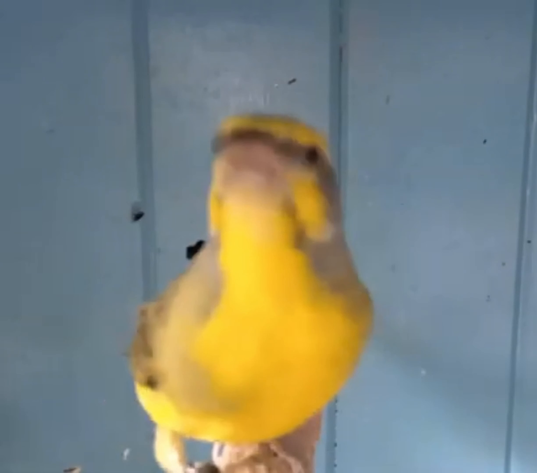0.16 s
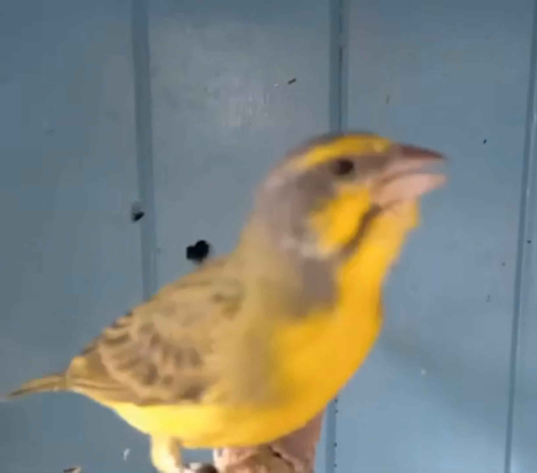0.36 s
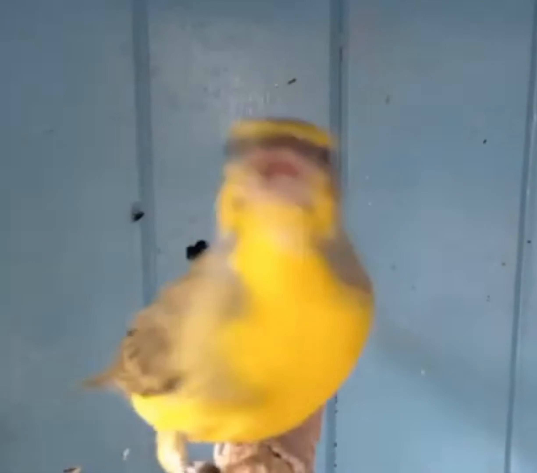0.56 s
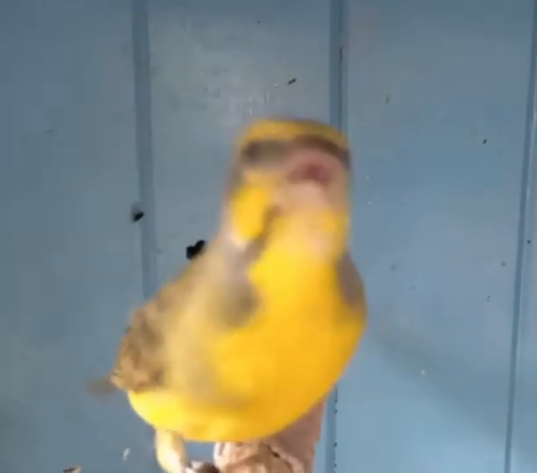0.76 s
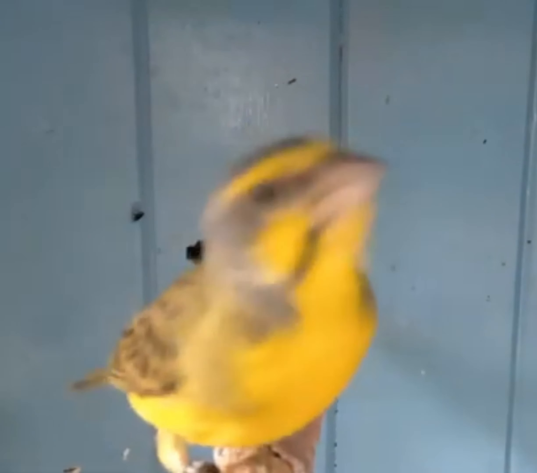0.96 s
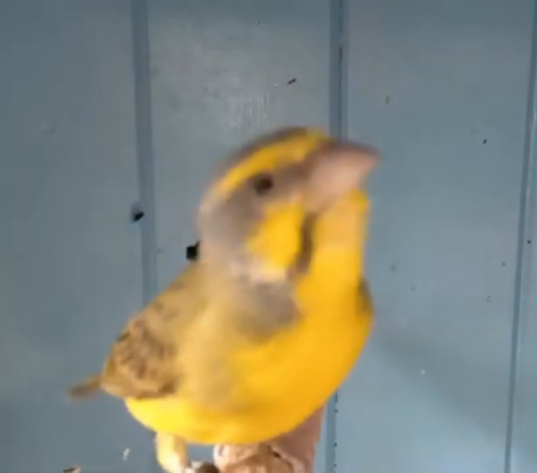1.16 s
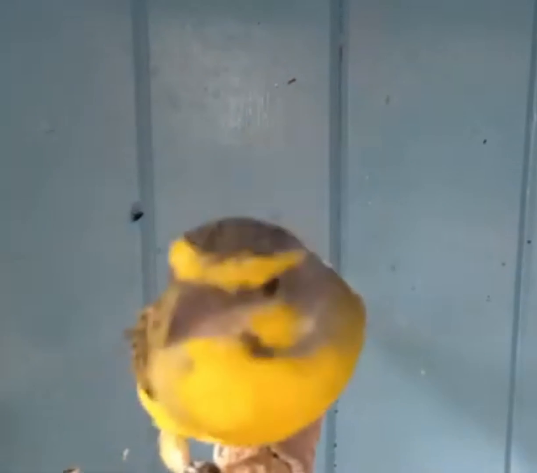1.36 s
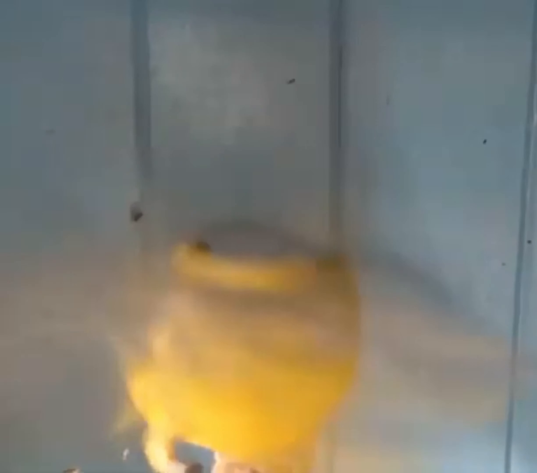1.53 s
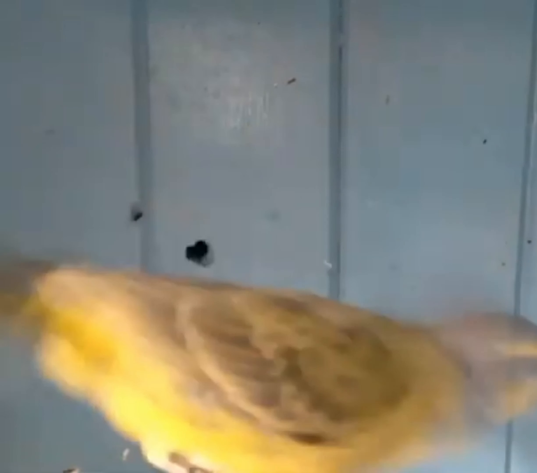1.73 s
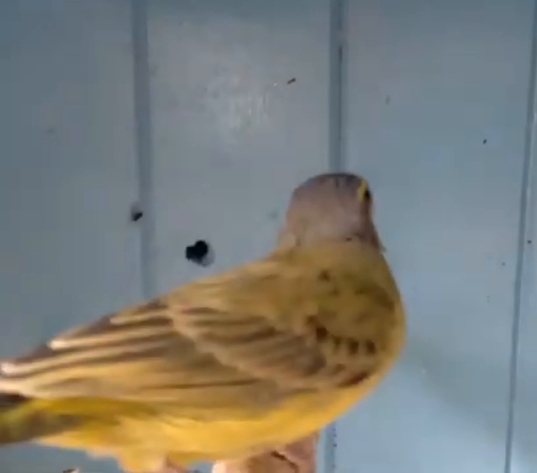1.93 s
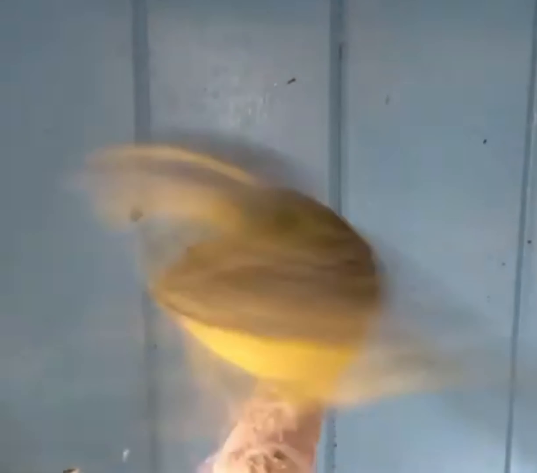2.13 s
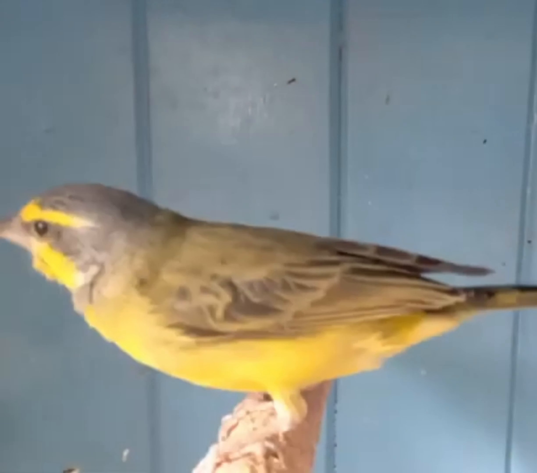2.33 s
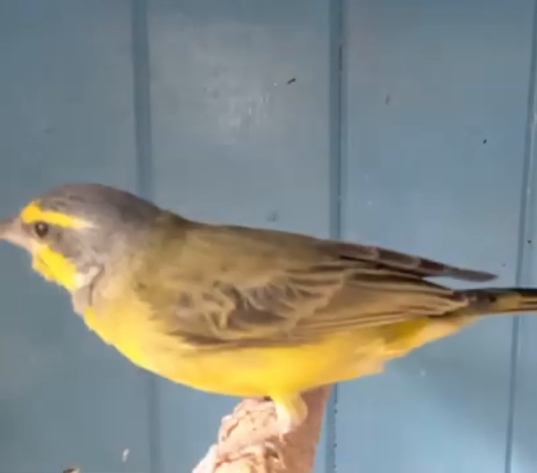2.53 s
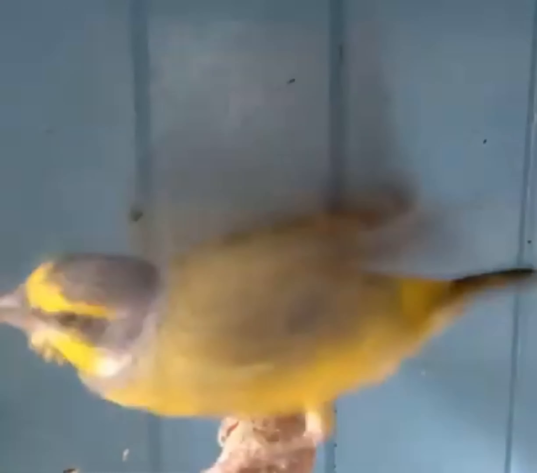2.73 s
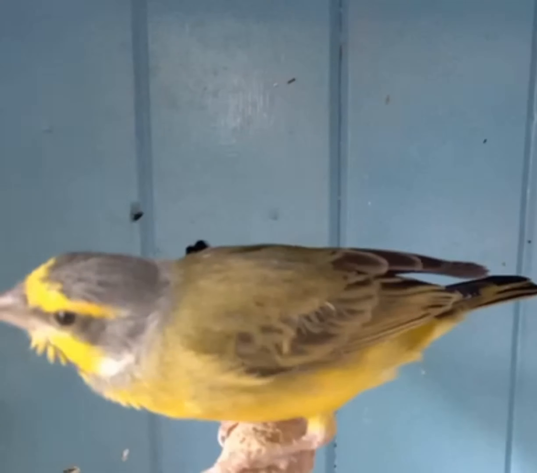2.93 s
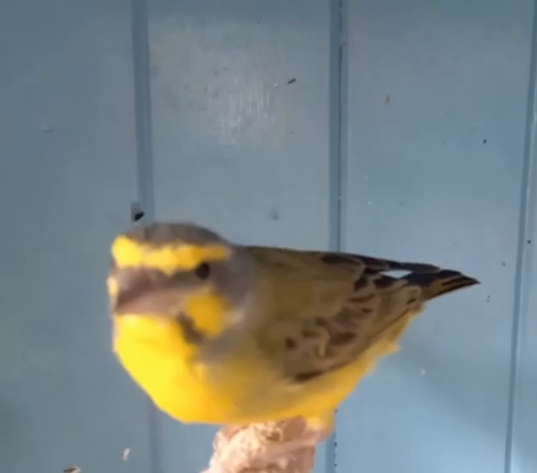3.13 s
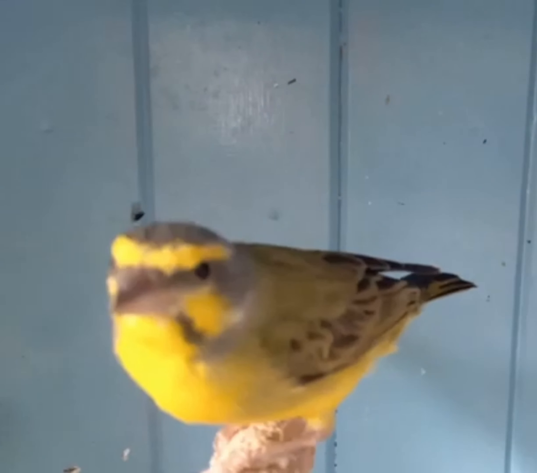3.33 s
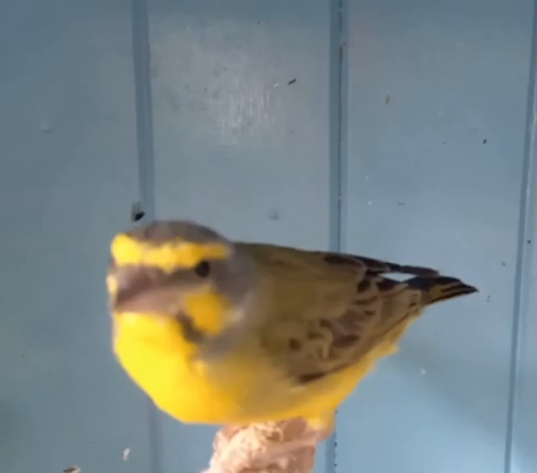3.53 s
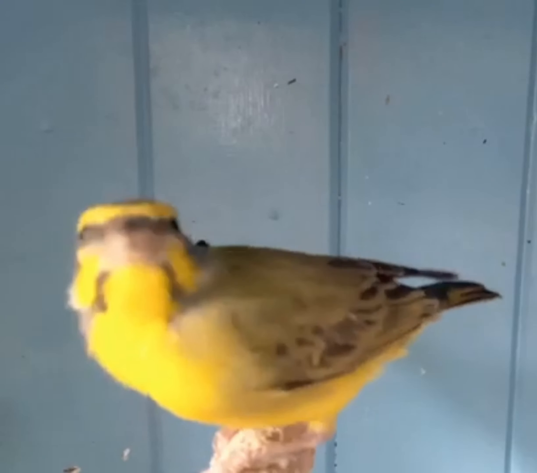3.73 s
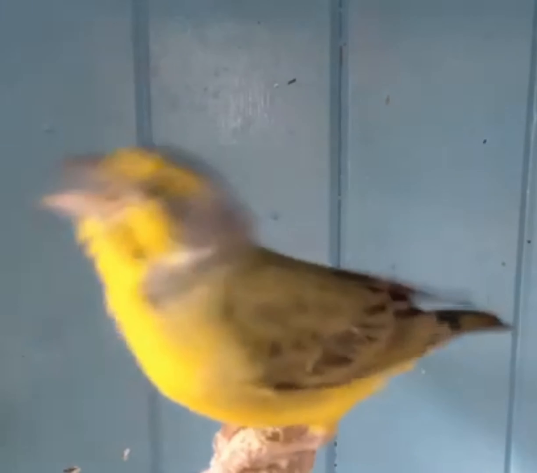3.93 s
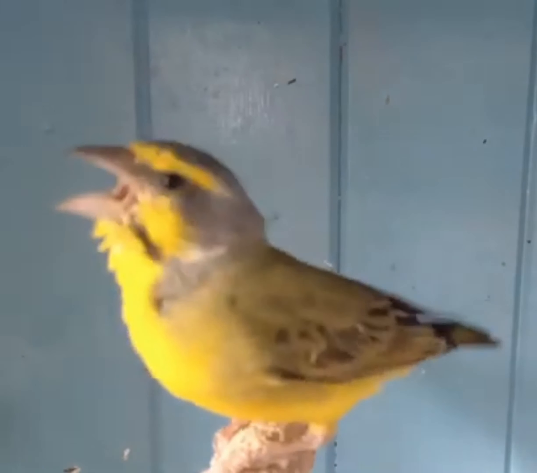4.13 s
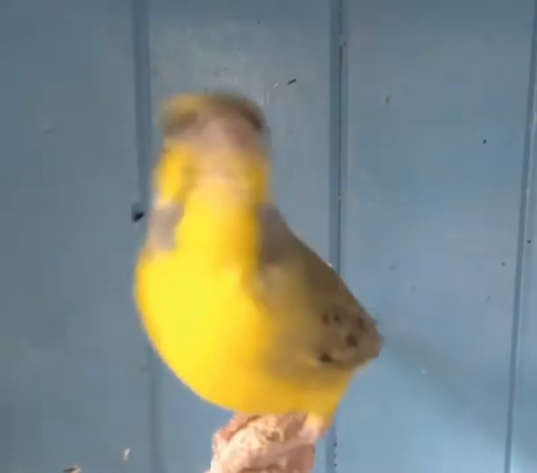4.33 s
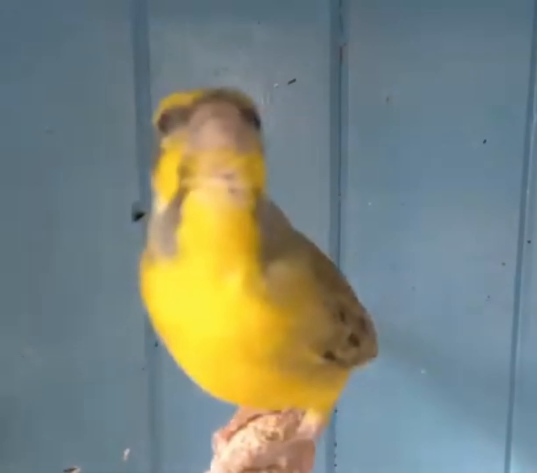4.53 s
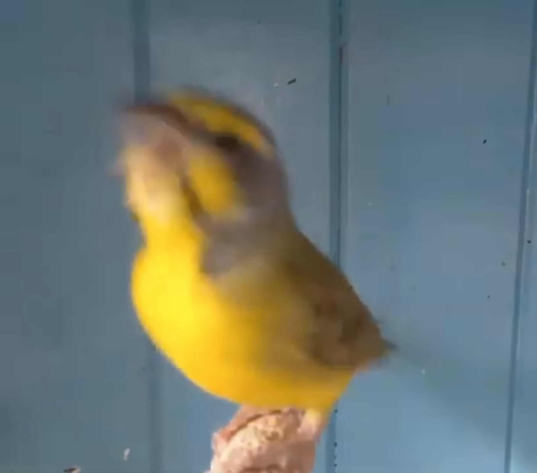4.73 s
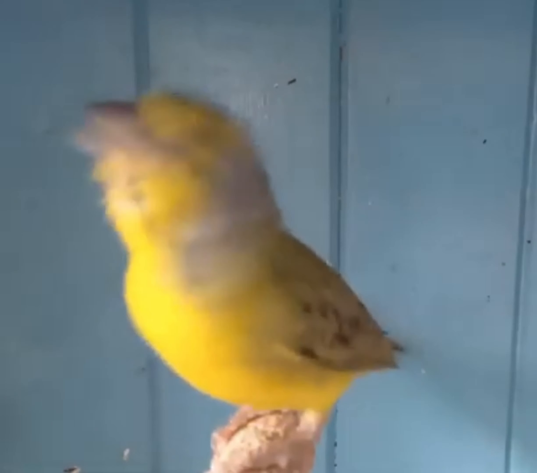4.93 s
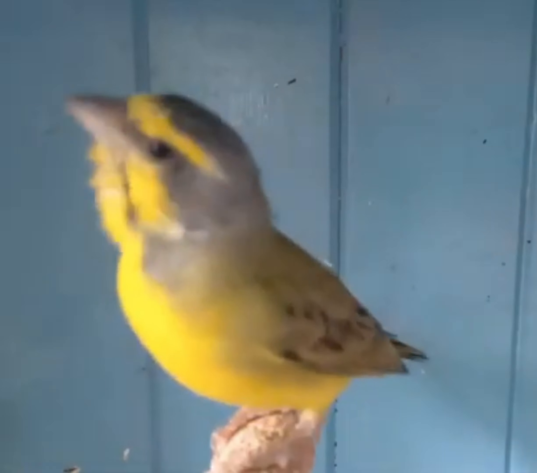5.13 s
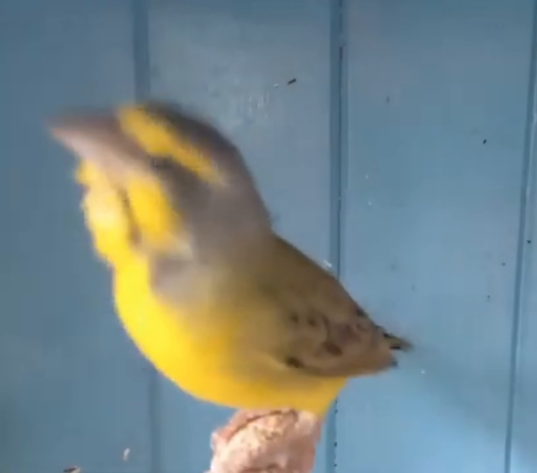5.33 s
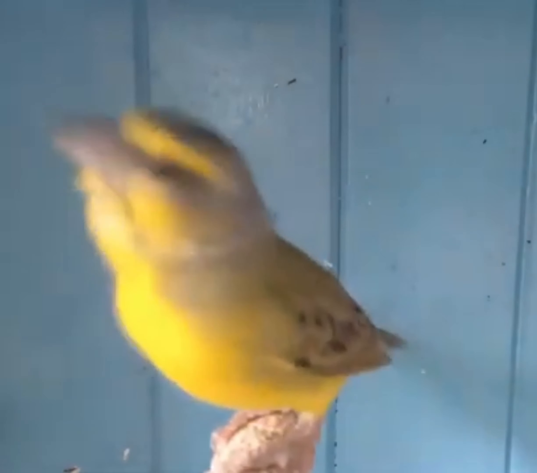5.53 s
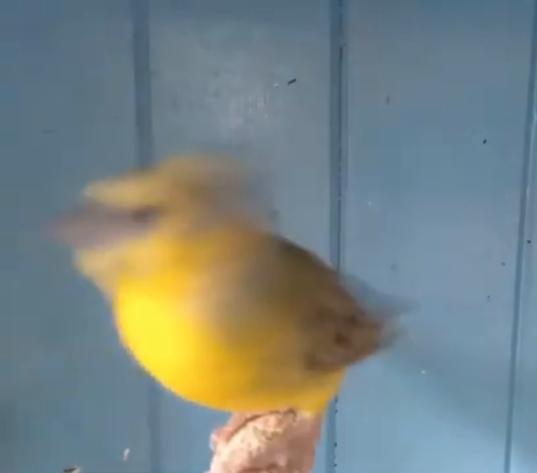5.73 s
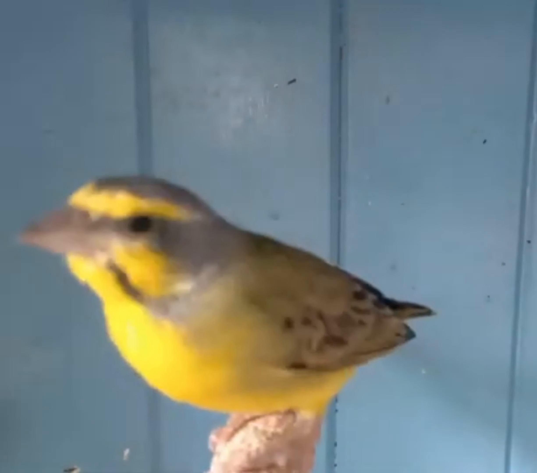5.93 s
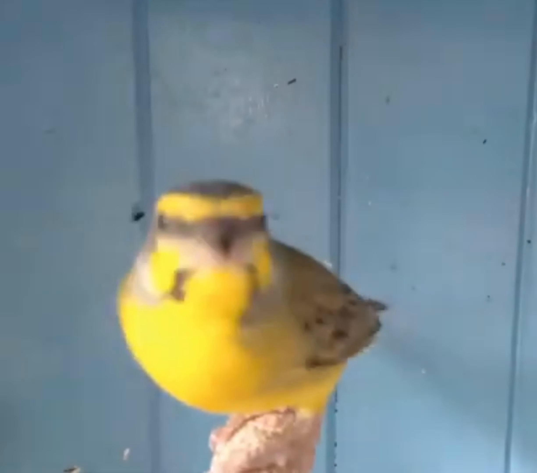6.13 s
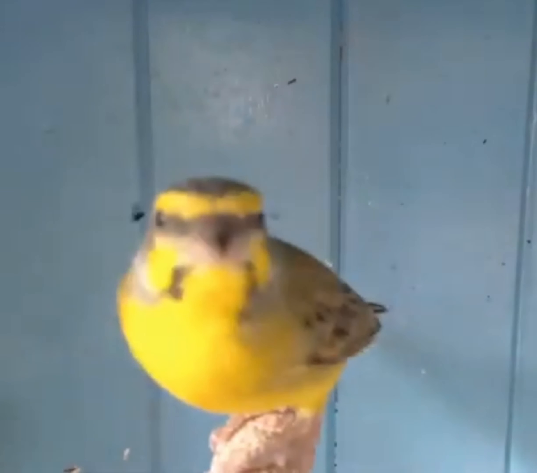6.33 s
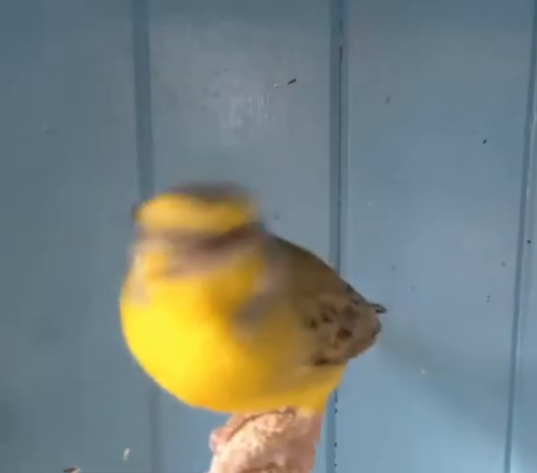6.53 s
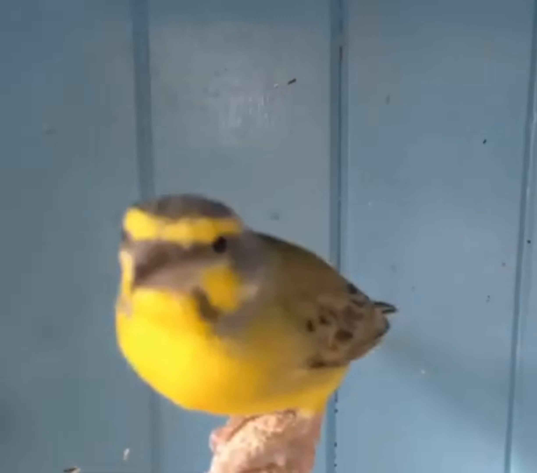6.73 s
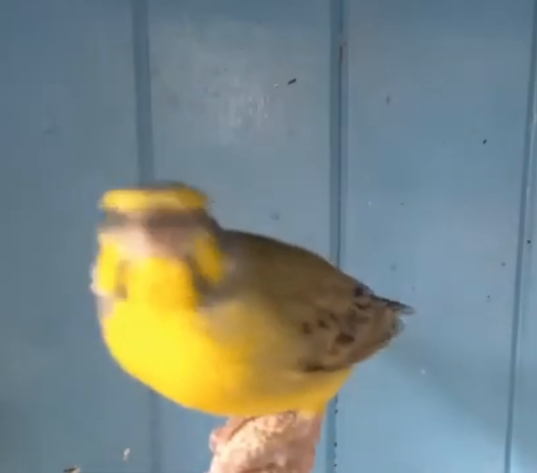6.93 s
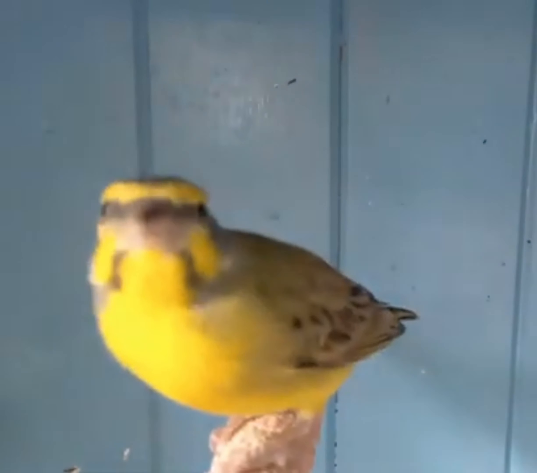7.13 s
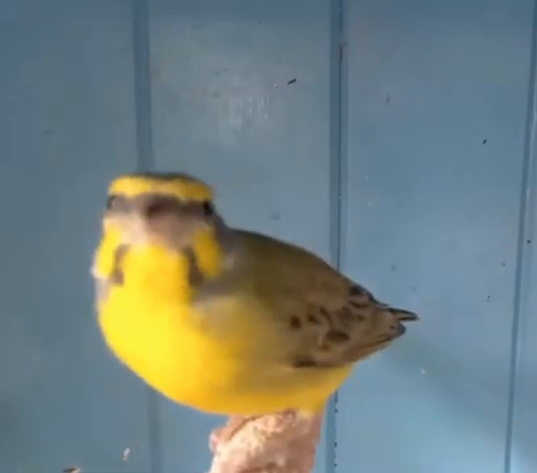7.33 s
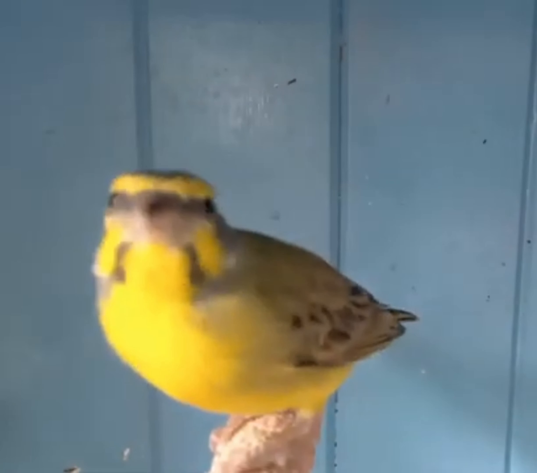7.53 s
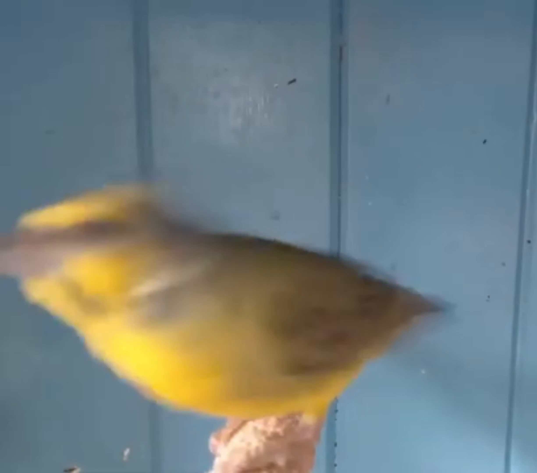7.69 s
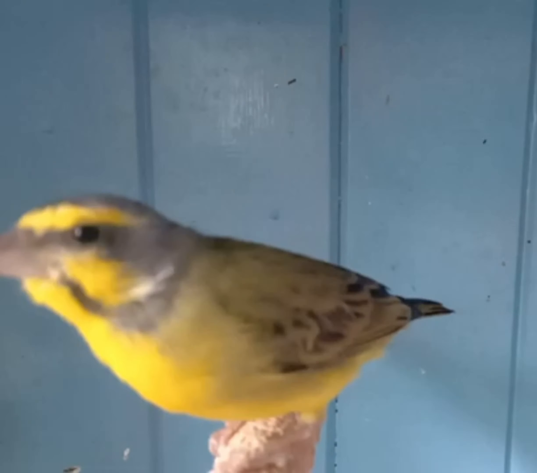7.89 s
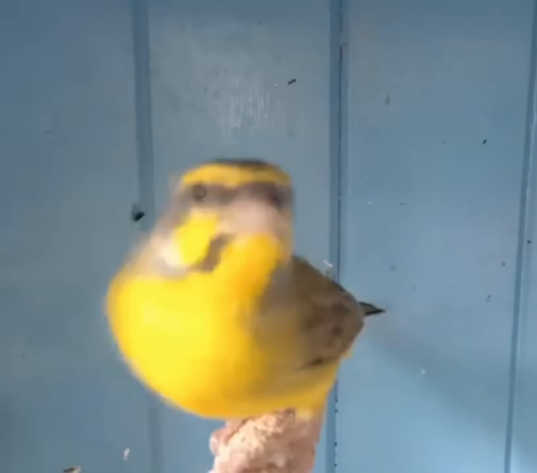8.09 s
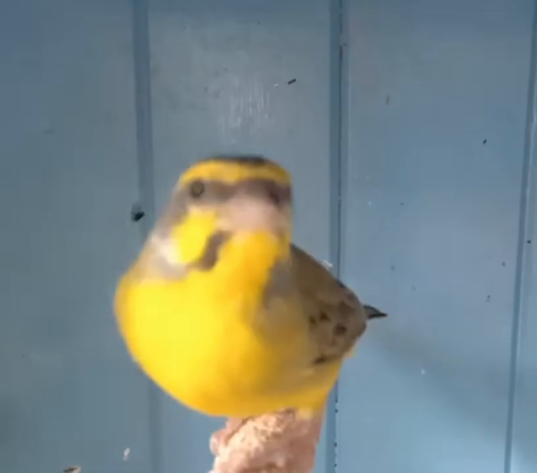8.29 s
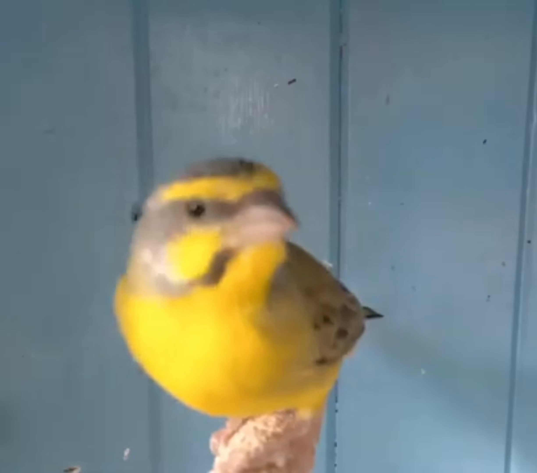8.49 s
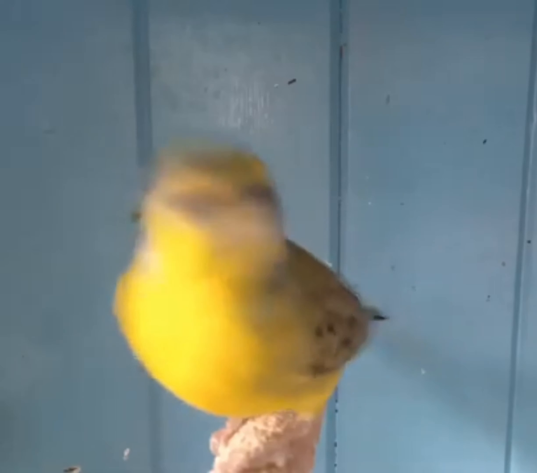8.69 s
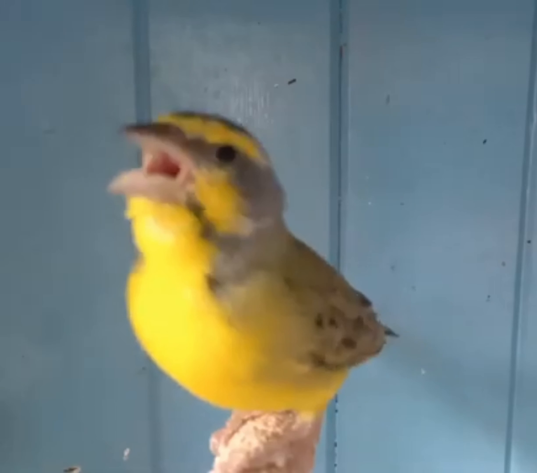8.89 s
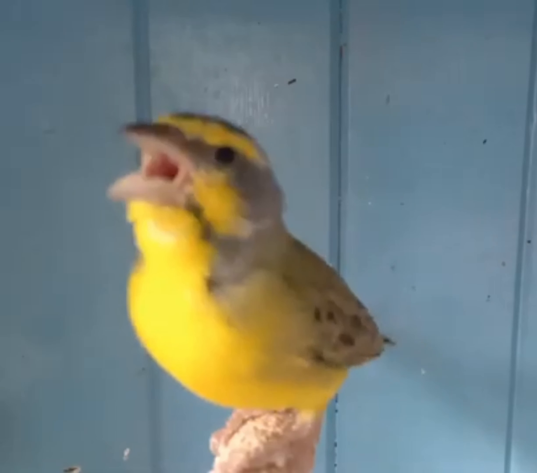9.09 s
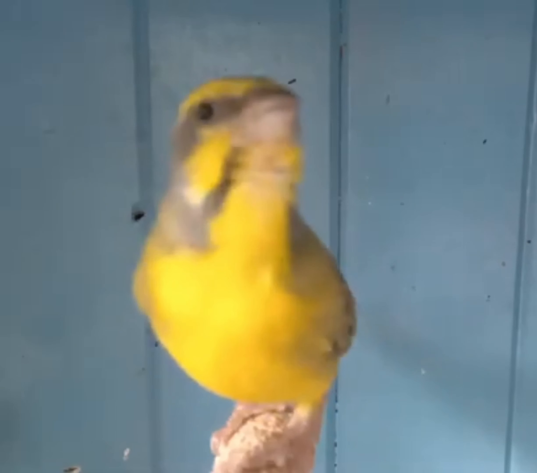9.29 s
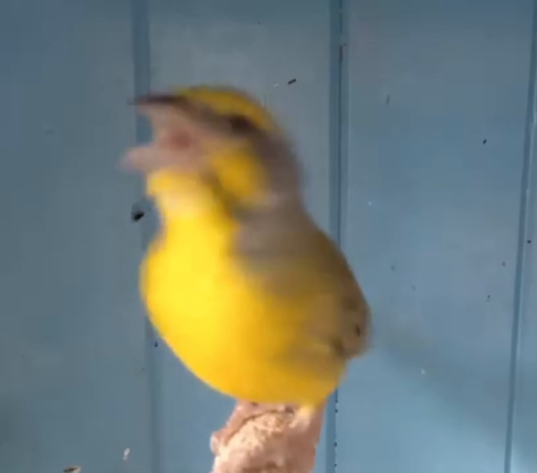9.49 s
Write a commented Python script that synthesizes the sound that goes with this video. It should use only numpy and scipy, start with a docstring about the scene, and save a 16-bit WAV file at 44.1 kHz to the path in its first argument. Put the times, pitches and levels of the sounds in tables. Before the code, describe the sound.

A small cage bird sings loud, piercing whistles, swoops and rapid zigzag sweeps very close, with fainter birds twittering in a small room between phrases.

```python
"""A caged canary sings close by in a small room: a high whistle, a swoop into a low whistle, then fast zigzag sweeps.
Each note is a near sine that follows drawn pitch and level contours, with weak overtones and a little breath noise.
Other cage birds, made the same way, answer and twitter further off, mostly heard by way of the room.
Puffs of coloured noise make the perch sounds; two faint hum tones and filtered noise make the airy hiss behind.
The recorder's gain control pulls everything down under each loud note."""
import sys
import numpy as np
from scipy import signal
from scipy.fft import rfft, irfft, next_fast_len
from scipy.io import wavfile
from scipy.ndimage import uniform_filter1d, minimum_filter1d

SR = 44100
rng = np.random.default_rng(int(sys.argv[2]) if len(sys.argv) > 2 else 0)


def log_audio(samples):
    """Write samples as a 16-bit WAV file to the path given in sys.argv[1]."""
    # one column per channel
    frames = np.atleast_2d(samples).T
    # limit to full scale, then quantise
    limited = np.clip(frames, -1, 1)
    pcm = np.round(limited * 32767).astype(np.int16)
    wavfile.write(sys.argv[1], SR, pcm)


N = 421155
TIME = np.arange(N) / SR

# Syllable shapes of the near bird, a few strokes between turning points of the voice:
# (time from the start [s], pitch [Hz], effort [dB], bend of the stroke that ends here)
SWOOP = [(0, 3500, -28, 0), (.008, 4950, 4, 1), (.034, 3200, 1, -.1), (.068, 2480, -7, .8),
         (.11, 2930, -3, 0), (.15, 3080, 1, .3), (.19, 3275, 6, .7), (.247, 3170, -6, -.7)]
UNDERTONE = [(0, 3268, -1, 0), (.036, 2930, 0, 0.9)]
HIGH_VOICE = [(0, 6850, 0, 0), (.03, 6970, 8, .6), (.08, 6900, 1, -.5)]
ZIGZAG = [(0, 6430, -3.5, 0), (.016, 3355, -21, .2), (.029, 5144, -9, -.2), (.039, 6610, 4.5, 0.41),
          (.048, 5700, 4.5, -0.34), (.087, 3414, 2, 0.98), (.102, 3580, -8, -.9), (.114, 4000, 5, 0.18),
          (.131, 4883, -2.5, -0.11)]
SPARK = [(0, 7840, 7, 0), (.008, 6330, -4.5, 0.54)]
VEE = [(0, 7020, 5, 0), (.013, 3680, -15.5, -0.005), (.023, 5650, 4, -.2), (.033, 6800, -8, 0.59)]
DIVE = [(0, 6990, 0, 0), (.045, 2770, 0, 0.38), (.084, 2340, -1.5, .1)]
# Syllable shapes of the other birds:
# (time from the start [s], pitch [Hz], effort [dB], bend of the stroke that ends here)
FALL = [(0, 6480, -21.5, 0), (.055, 4640, 0.5, .3), (.16, 2791, 7, .2), (.215, 2660, -3.5, 0.71)]
TWITTER = [(0, 4380, 12.5, 0), (.011, 5820, 1.5, 0.28), (.016, 4280, -32, 0.061), (.021, 4300, 2.5, 0),
           (.034, 6260, -9, .3)]
CHIP = [(0, 2530, 6, 0), (.04, 3020, 5.5, 1), (.056, 2800, -9, -1)]
CHIRP = [(0, 3600, -6, 0), (.014, 4020, -1, 1), (.054, 3920, -11, 0)]


def from_db(db):
    """Turn decibels into an amplitude factor."""
    return 10 ** (np.asarray(db) / 20)


def rms_one(x):
    """Scale a sound to rms 1."""
    return x / np.sqrt(np.mean(x ** 2) + 1e-20)


def at_hz(points, hz):
    """Read a spectrum on a log-frequency axis."""
    point_hz, db = np.transpose(points)
    return np.interp(np.log(np.maximum(hz, 1)), np.log(point_hz), db)


def noise(spectrum, size=N):
    """Noise of a given colour, rms 1, fading away below its lowest point."""
    hz = np.arange(size // 2 + 1) * SR / size
    low_fade = np.minimum(hz / spectrum[0][0], 1) ** 2
    gain = from_db(at_hz(spectrum, hz)) * low_fade
    return rms_one(irfft(rfft(rng.standard_normal(size)) * gain, size))


def waver(t, per_s):
    """A smooth random wobble of spread about 1, with per_s new random values a second."""
    place = (t - t[0]) * per_s
    knots = rng.standard_normal(int(place[-1]) + 2)
    eased = np.floor(place) + np.sin(np.pi / 2 * (place % 1)) ** 2
    return np.interp(eased, np.arange(len(knots)), knots)


def add(out, start_s, sound):
    """Mix a sound in at a given time."""
    i = int(np.clip(round(start_s * SR), 0, N))
    out[i:i + len(sound)] += sound[:N - i]


def song():
    """The near bird: each learned shape is repeated at slightly different pitch and strength."""
    # (shape, overtones [dB], rasp [0-1], rows of (time [s], level [dB], pitch ratio))
    phrases = [ (SWOOP, -25.5, 0.00033, [(.239, 1.5, 1), (4.415, 1, 1), (9.271, 1, 1.003)]),
               (UNDERTONE, -17, .004, [(.275, -11, 1), (4.458, -14, 1), (9.311, -12, 0.98)]),
               (HIGH_VOICE, -30, .015, [(.33, -33, 1), (9.345, -28, 1)]),
               (ZIGZAG, -28.5, 0.0016, [(.562, 2.5, 0.97), (.7625, 3.5, 0.99), (4.733, 0.5, 0.98),
               (4.9495, -1, 0.98)]), (SPARK, -15.5, 0.028, [(.572, 7, 0.94), (.773, -8, 0.94),
               (4.743, -9, 0.93), (4.959, -10, 0.93)]), (VEE, -36.5, 0.00077, [(.939, -0.5, 1.01),
               (1.115, 1, 1), (5.131, -3.5, 1.04), (5.3085, -5.5, 1.024), (5.4945, -7, 1)]),
               (DIVE, -32, 0.00085, [(.987, 2.5, 1.005), (1.1665, 1.5, 1), (5.1795, -1.5, 1.022),
               (5.357, -1, 1), (5.542, 3, 1)])]
    out = np.zeros(N)
    for shape, overtones_db, rasp, repeats in phrases:
        for start, db, ratio in repeats:
            sound = syllable(shape, ratio, overtones_db + brightness(start), rasp)
            add(out, start, from_db(db) * sound)
    return out


def whistles(attack_s=0.018, attack_db=12, step_rasp=.002):
    """Long notes: a held pitch, a slightly hoarse step up with more effort, a slow climb, a quick release."""
    # The near bird's long high whistles: (start [s], middle of the step [s], end [s], step time [s],
    # step [Hz], level before [dB], level after [dB])
    long_notes = [(0, 0.035, .146, 0.019, 427, -2, 9), (4.035, 4.213, 4.335, 0.015, 431, -6, 5.5),
                  (8.856, 9.059, 9.176, 0.014, 438, -0.5, 6)]
    held_hz, climb_hz_per_s = 5299, 2000
    flick_hz, flick_s = 414, .012   # a drop onto the pitch from above
    release_s, release_db = .02, 16
    out = np.zeros(N)
    for start, step_at, end, step_s, step_hz, before_db, after_db in long_notes:
        t = np.arange(start, end, 1 / SR)
        step = .5 + .5 * np.tanh((t - step_at) / step_s)
        has_flick = step_at - start > 2 * step_s   # left out where the step comes at once
        flick = flick_hz * np.exp(-(t - start) / flick_s) * has_flick
        climb = climb_hz_per_s * np.maximum(t - step_at, 0)
        pitch = held_hz + flick + step_hz * step + climb + 22 * waver(t, 35)
        attack = attack_db * np.exp(-(t - start) / attack_s)
        release = release_db * np.clip(1 - (end - t) / release_s, 0, 1) ** 2
        level = before_db + (after_db - before_db) * step - attack - release
        rasp = step_rasp * step * (1 - step)   # hoarse only during the step
        add(out, start, note(pitch, level, -26 + brightness(start), rasp, flutter_db=3.67))
    return out


def brightness(s):
    """Overtone level (dB) from phrase to phrase, as the near bird turns its head."""
    # (time [s], level [dB])
    head_turns = [(0, -3), (1.2, -2.5), (4.4, -1.5), (5.5, 3.5), (8.86, -7.5), (9.27, -3.5)]
    return np.interp(s, *np.transpose(head_turns))


def syllable(shape, ratio, overtones_db, rasp):
    """Strokes joined end to end; the level is the effort plus how well the pitch carries."""
    # How strongly each pitch carries; the lowest notes are weak: (frequency [Hz], level [dB])
    carrying_power = [(2350, -23), (2650, -10.5), (3000, -7), (3300, -2.5), (3600, -3.5), (4050, 0.5),
                      (4600, -1), (5700, 7.5), (6900, -7.5)]
    s, hz, effort, bend = np.transpose(sorted(shape))
    t = np.arange(s[0], s[-1], 1 / SR)
    place = np.interp(t, s, np.arange(len(s)))
    k = np.minimum(place.astype(int), len(s) - 2)   # which stroke
    pitch = ratio * glide(hz[k], hz[k + 1], bend[k + 1], place - k)
    level = np.interp(t, s, effort) + at_hz(carrying_power, pitch)
    return note(pitch, level, overtones_db, rasp)


def glide(from_hz, to_hz, bend, u):
    """Pitch along one stroke, as u goes from 0 to 1."""
    # Bend 1 sets off fast and eases in, -1 starts gently and speeds up, 0 is an even glide
    return from_hz * (to_hz / from_hz) ** (u + bend * u * (1 - u))


def note(pitch, level, overtones_db, rasp, flutter_db=1.04, ripple_db=3.5, rolloff_db=6.5, air_db=15,
         strain_db=6, strain_rasp=0.018, edge_s=.004):
    """The syrinx: a near sine on a pitch and level contour, with weak overtones coloured by the beak."""
    # Air rushing past the syrinx: (frequency [Hz], level [dB])
    breath_colour = [(2200, -24.5), (2900, -6.5), (4500, 14.5), (6000, -6), (7000, -15), (8000, -9.5),
                     (10000, -2.5), (14800, -6.5), (16000, -24)]
    # Overtone colour given by the beak: (frequency [Hz], level [dB])
    beak_colour = [(4500, 3), (6500, 1), (7300, -9.5), (8500, -10), (10400, 1), (12500, -10), (14800, 17.5),
                   (16000, -12)]
    t = TIME[:len(pitch)]
    hz = uniform_filter1d(pitch, size=130, mode="nearest")   # muscles round the corners
    # Fast glides are brighter and noisier than held notes
    strain = np.tanh(np.gradient(np.log(hz)) * SR / 25) ** 2
    hz = hz * (1 + rasp * waver(t, 2500) + .0008 * waver(t, 90))
    phase = 2 * np.pi * np.cumsum(hz) / SR
    breath = noise(breath_colour, size=next_fast_len(len(t)))[:len(t)]
    tone = np.sin(phase) + (rasp + strain_rasp * strain) * from_db(air_db) * breath
    for k in range(2, 7):
        overtone_db = overtones_db + strain_db * strain - rolloff_db * (k - 2) + at_hz(beak_colour, k * hz)
        tone += from_db(overtone_db) * (k * hz < SR / 2) * np.sin(k * phase)
    to_nearest_end = np.minimum(t, t[-1] - t)
    gate = np.sin(np.pi / 2 * np.clip(to_nearest_end / edge_s, 0, 1)) ** 2
    unsteady_level = level + flutter_db * waver(t, 80) + ripple_db * strain * waver(t, 220)
    return tone * gate * from_db(unsteady_level)


def answers(run_swell_db=2):
    """The other birds: runs of one syllable, loudest in the middle, some with a drifting tempo."""
    # (shape, overtones [dB], rasp [0-1],
    # rows of (start [s], count, first gap [s], growth of each gap [s], level [dB], pitch ratio))
    calls = [ (FALL, -24.5, 0.017, [(.475, 2, .295, 0, -16.5, 0.98), (1.02, 2, .28, 0, -21, 1)]),
             (TWITTER, -24.5, 0.01, [(1.338, 12, .052, 0, -33, 0.96)]),
             (CHIP, -14, .012, [(1.655, 2, .08, 0, -35, 1.1), (2.642, 2, .093, 0, -32, 0.97),
             (2.7, 2, .145, 0, -54, 1.74), (3.585, 1, 0, 0, -39.5, 1), (6.65, 4, .065, 0.00071, -55, 1.06),
             (7.15, 2, .055, 0, -52.5, 1.59), (7.2, 1, 0, 0, -32.5, 1.06), (7.265, 2, .065, 0, -35, 1.12),
             (7.58, 1, 0, 0, -42, 1.23), (8.672, 7, .0965, -.003, -37.5, 1.27),
             (8.785, 4, .073, .0066, -29.5, 1.06)]),
             (CHIRP, -25.5, 0.034, [(3.642, 6, .05, 0.0036, -25.5, 0.98), (7.25, 5, .049, .006, -26.5, 1)])]
    out = np.zeros(N)
    for shape, overtones_db, rasp, runs in calls:
        for start, count, gap, growth, db, ratio in runs:
            for k in range(round(count)):
                swell = run_swell_db * (np.sin(np.pi * (k + .5) / round(count)) - 1)
                at_s = start + gap * k + growth * k * (k - 1) / 2
                add(out, at_s, from_db(db + swell) * syllable(shape, ratio, overtones_db, rasp))
    return out


def slurs(swell_db=4.5):
    """Soft slurred whistles from further off: single pitch strokes that swell and fade."""
    # (start [s], length [s], from [Hz], to [Hz], bend, level [dB])
    strokes = [(0, .1, 3740, 3313, .3, -47), (.05, 0.12, 2950, 2575, 0.47, -48),
               (0.146, 0.064, 4540, 3480, 0, -29), (0.346, 0.065, 1300, 1900, 0.66, -30.5),
               (1.879, 0.28, 3100, 3335, 0.7, -53), (2.22, 0.16, 5200, 4310, -0.83, -49.5),
               (2.48, 0.41, 4000, 3405, 1, -55), (2.984, 0.13, 5950, 6730, 1.22, -46.5),
               (3.197, 0.13, 3200, 3260, 0, -58), (3.341, 0.11, 3290, 3660, 0.55, -53.5),
               (7.434, 0.052, 5160, 5150, -0.33, -44), (7.475, 0.136, 2586, 2510, 0.12, -49.5),
               (7.67, 0.085, 2520, 3060, 0.45, -45.5), (7.783, 0.23, 3150, 3375, 0.89, -44.5),
               (8.06, 0.12, 4970, 5094, 1.03, -45.5), (8.16, 0.15, 4900, 4130, 0.18, -54),
               (8.36, 0.19, 3900, 3440, 0.19, -48.5), (8.433, 0.088, 4830, 4030, 1.3, -27.5)]
    out = np.zeros(N)
    for start, length, from_hz, to_hz, bend, db in strokes:
        u = np.linspace(0, 1, int(length * SR))
        level = db + swell_db * (np.sin(np.pi * u) - 1)
        pitch = glide(from_hz, to_hz, bend, u)
        add(out, start, note(pitch, level, overtones_db=-22.5, rasp=0.015))
    return out


def room(x, walls_db, tail_db, t60_s, early_db, early_s=0.036, build_s=0.0024):
    """A few reflections off near walls, a dense early scatter, then a diffuse tail."""
    # First reflections: (delay [s], level [dB])
    wall_echoes = [(.0013, -40), (.0031, -15.5), (.0056, -14)]
    # Colour of the scatter and tail: (frequency [Hz], level [dB])
    tail_colour = [(1000, -8.5), (2500, 1.5), (4200, -0.5), (6000, -2), (8000, 1.5), (15000, -5.5)]
    t = TIME[:SR // 2]
    decay = from_db(-60 * t / t60_s) + from_db(early_db) * np.exp(-t / early_s)
    build = 1 - np.exp(-t / build_s)
    tail = noise(tail_colour, size=len(t)) * decay * build
    out = x + from_db(tail_db) * signal.fftconvolve(x, tail / np.linalg.norm(tail))[:N]
    for delay, db in wall_echoes:
        echo = np.interp(TIME - round(delay * SR) / SR, TIME, x, left=0)
        out += from_db(db + walls_db) * echo
    return out


def perch():
    """Claws and feathers on the perch as scuffs of noise, with soft low bumps."""
    # Scuffs: (time [s], level [dB], decay [s])
    scuffs = [(2.16, -43.5, 0.12), (2.5, -53.5, 0.015), (2.79, -56, 0.017), (5.97, -53, .06),
              (6.17, -53.5, 0.075), (6.48, -53.5, 0.037), (6.66, -49, 0.027), (6.72, -51.5, 0.02),
              (6.82, -48, 0.014), (6.88, -40.5, 0.01), (7.72, -49.5, 0.24), (8.335, -52.5, 0.027),
              (8.375, -44, 0.016), (8.53, -50, 0.17)]
    # Bumps: (time [s], level [dB], decay [s])
    bumps = [(.36, -34.5, 0.03), (4.64, -52, 0.036), (5.425, -35, .03), (8.04, -30.5, 0.016),
             (8.37, -41, 0.056)]
    # Colour of the scuffs: (frequency [Hz], level [dB])
    scuff_colour = [(300, -5), (2200, 4.5), (4000, -6), (7000, -13.5), (14000, -21), (16000, -45)]
    # Colour of the bumps: (frequency [Hz], level [dB])
    bump_colour = [(40, -24.5), (130, -4), (260, -1.5), (450, -10), (1200, -23.5), (4000, -50.5)]
    return bursts(scuffs, scuff_colour, rise_s=0.00055) + bursts(bumps, bump_colour, rise_s=0.0045)


def bursts(table, colour, rise_s):
    """Puffs of noise that swell quickly and die away."""
    level = np.zeros(N)
    t = TIME[:SR]
    for start, db, decay in table:
        add(level, start, from_db(db) * (1 - np.exp(-t / rise_s)) * np.exp(-t / decay))
    return level * noise(colour)


def background():
    """Airy hiss from a slightly wavering low noise and a steady high one, with a faint hum of sines."""
    # Colour of the low part: (frequency [Hz], level [dB])
    low_colour = [(18, -44), (30, -16.5), (52, -9.5), (124, 0.5), (147, -3.5), (173, -6.5), (247, -4.5),
                  (287, -15), (425, -12), (503, -19.5), (562, -10.5), (897, -1.5), (1100, -10), (1690, -17),
                  (2600, -24.5), (3380, -52), (5720, -120)]
    # Colour of the high part: (frequency [Hz], level [dB])
    top_colour = [(1800, -32.5), (2500, -10.5), (3200, -1), (4500, -18), (7000, -21), (10000, -35.5),
                  (15000, -36.5)]
    # Hum tones: (frequency [Hz], rms level [dB])
    hum_tones = [(63, -58), (139, -57)]
    hum = np.zeros(N)
    for hz, db in hum_tones:
        phase = 2 * np.pi * hz * TIME + 0.69 * waver(TIME, 1.3)
        hum += from_db(db) * np.sqrt(2) * np.sin(phase)
    low = from_db(-42 + 1.4 * waver(TIME, 11)) * noise(low_colour)
    return low + from_db(-68) * noise(top_colour) + hum


def scene():
    """The near bird is almost dry; the others arrive mostly by way of the room."""
    near = room(song() + whistles(), walls_db=1.0, tail_db=-19.5, t60_s=0.19, early_db=-2, early_s=0.018)
    far = room(answers(), walls_db=2.5, tail_db=-1, t60_s=.52, early_db=17.5, early_s=0.016)
    farthest = room(slurs(), walls_db=3.5, tail_db=4.5, t60_s=.75, early_db=6)
    others = from_db(-5) * far + from_db(-8) * farthest
    # Distance dulls the overtones
    distant = signal.lfilter(*signal.butter(1, 9000, fs=SR), others)
    return (near + distant + perch() + background())[None]


def gain_control(x, threshold_db=-10.5, slope=0.77, release_db_per_s=170, attack_s=0.00028):
    """Loud notes turn the gain down just ahead of their peaks; it recovers within a tenth of a second."""
    level = 10 * np.log10(np.maximum(uniform_filter1d(x[0] ** 2, size=128), 1e-12))
    cut = np.clip(slope, 0, 1) * np.maximum(level - threshold_db, 0)
    cut = -minimum_filter1d(-cut, size=200)   # looks 2 ms ahead
    release = release_db_per_s * TIME
    cut = np.maximum.accumulate(cut + release) - release   # the cut lets go at a steady rate
    cut = uniform_filter1d(cut, size=66)   # the gain moves smoothly, without ticks
    r = np.exp(-1 / (attack_s * SR))
    return x * from_db(-signal.lfilter([1 - r], [1, -r], cut))


def record(dry):
    """Gain control, a ceiling on the peaks, and a steep top cut at 15.5 kHz."""
    held = np.clip(gain_control(dry), -.97, .97)
    top_cut = signal.ellip(10, .1, 80, 15500, fs=SR, output="sos")
    return signal.sosfilt(top_cut, held)


dry = scene()
out = record(dry)
log_audio(out)
```